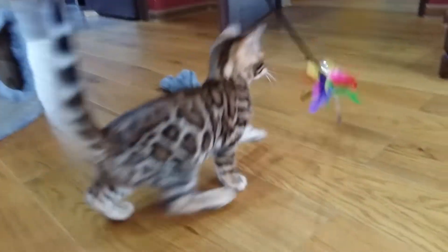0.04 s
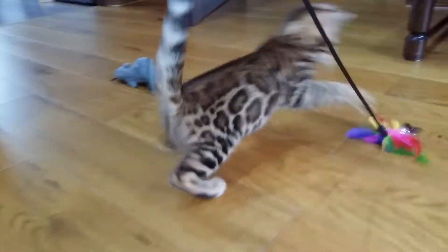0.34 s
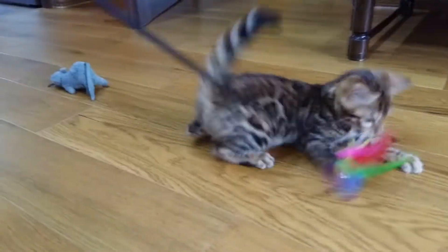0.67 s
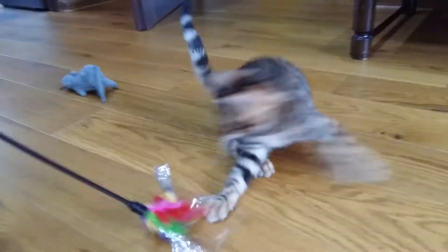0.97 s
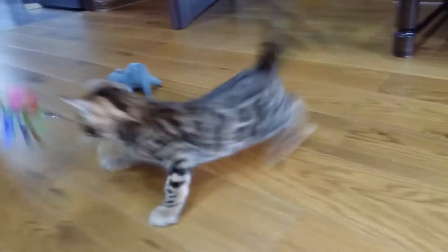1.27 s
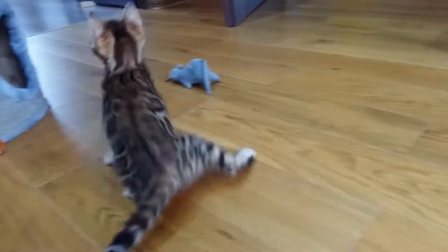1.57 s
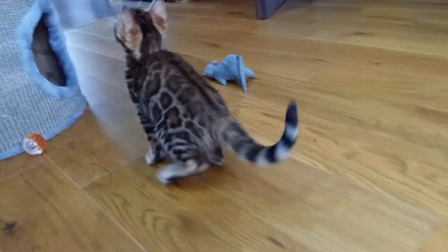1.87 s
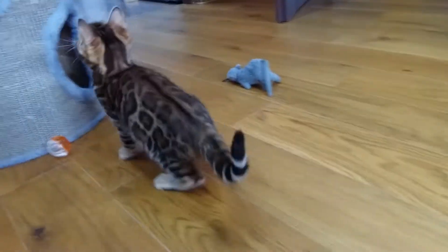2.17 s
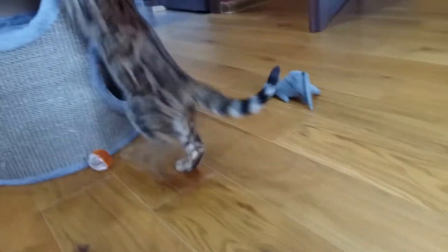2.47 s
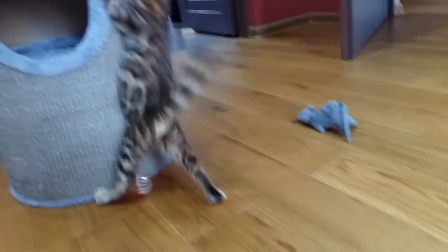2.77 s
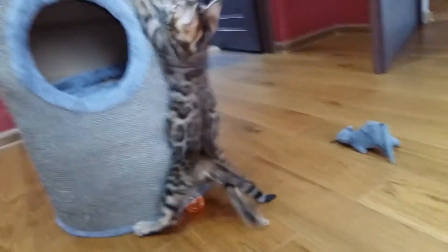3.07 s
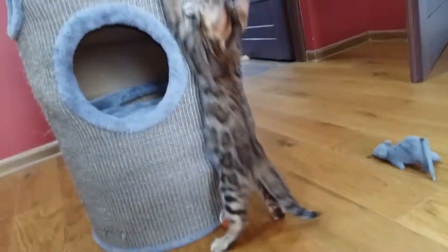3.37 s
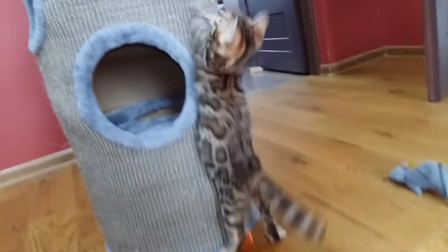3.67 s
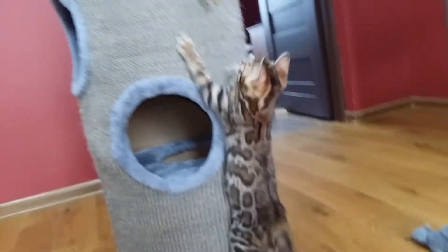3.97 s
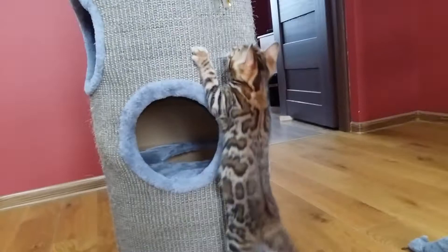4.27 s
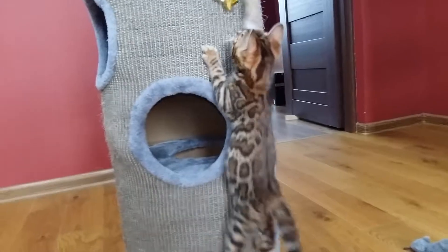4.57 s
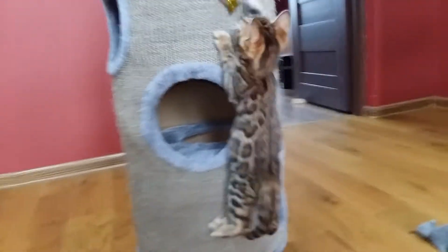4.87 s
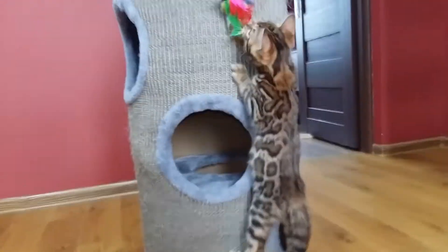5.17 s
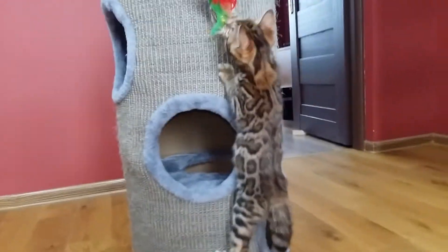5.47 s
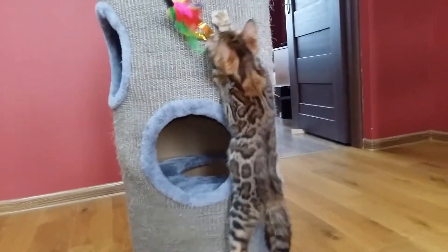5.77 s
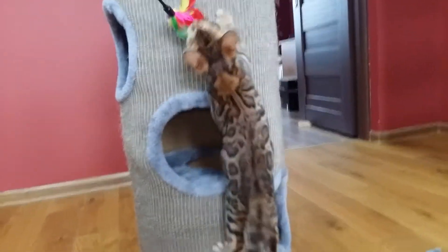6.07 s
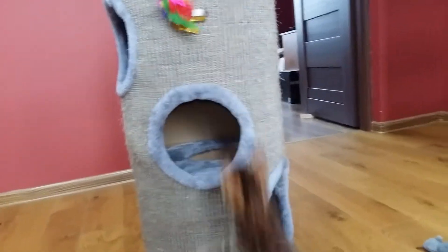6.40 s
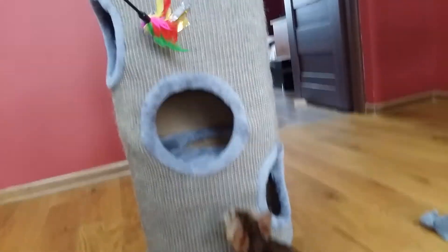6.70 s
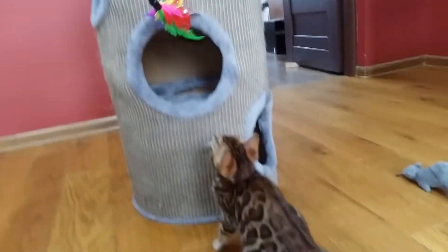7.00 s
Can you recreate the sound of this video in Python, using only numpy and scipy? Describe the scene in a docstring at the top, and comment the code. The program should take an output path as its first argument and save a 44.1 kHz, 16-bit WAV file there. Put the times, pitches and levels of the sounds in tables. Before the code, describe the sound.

A kitten scampers over floorboards in quick, uneven thumps, mixed with the crinkle and sharp slaps of a foil toy. After a short lull it climbs a scratching tower with hollow pats and raspy claws, and a kicked bell ball rattles for a moment. Dry little ticks continue until firmer pats lead to a loud, knocking landing on wood. The microphones are close, in a small room with slight reverberation and a faint hush.

```python
"""A kitten chases a tinsel wand toy over a wooden floor, kicks a bell ball and climbs a hollow sisal tower.
Paws drive the board and tower resonances, claws scratch the rope, and the drop back down knocks hard.
The foil rustles as a shower of tiny snaps; the plastic ball clacks and rolls while a pellet rings its bell.
Two close microphones in a small, fairly live room with a low hush."""
import sys
import numpy as np
from scipy import signal
from scipy.fft import rfft, irfft, next_fast_len
from scipy.io import wavfile
from scipy.ndimage import uniform_filter1d, map_coordinates

SR = 44100
rng = np.random.default_rng(int(sys.argv[2]) if len(sys.argv) > 2 else 0)


def put_to_file(sound):
    """Save the sound as 16-bit audio at rate SR, in the file named by the first command-line argument."""
    columns = np.atleast_2d(sound).T  # one column per channel
    safe = np.clip(columns, -1, 1)
    whole_steps = np.round(safe * 32767)
    wavfile.write(sys.argv[1], SR, whole_steps.astype(np.int16))


N = 310464
FFT_SIZE = 16384
HZ = np.fft.rfftfreq(FFT_SIZE, 1 / SR)
TIME_S = np.arange(N) / SR

# room tone spectrum: f/Hz, level/dB (all table levels are relative)
HUSH_COLOUR = [(48, -5.5), (107, -2.5), (537, -11), (1020, -16), (1850, -17), (4040, -28), (5430, -38),
               (15500, -42.5)]
# room tone drift: t/s, level/dB
HUSH_DRIFT = [(.3, -58), (2.5, -59), (3.9, -61.5), (5.2, -59), (5.85, -63), (7, -58.5)]
# paws on the floor: t/s, thump/dB, claw/dB
FLOOR_STEPS = [(0.212, -47, -69), (0.484, -31, -52.5), (0.561, -42, -62), (0.62, -36.5, -74),
               (0.694, -35, -51), (0.711, -34, -62), (0.775, -37, -65), (0.908, -29, -66),
               (1.016, -34, -37), (1.141, -33, -50.5), (1.358, -42.5, -48), (1.427, -44.5, -52),
               (1.487, -22.5, -42), (1.515, -33.5, -52), (1.588, -24, -63), (2.169, -50, -66.5)]
# floorboard resonances: f/Hz, width/Hz, level/dB
BOARD_MODES = [(72, 24, 1), (108, 32, -2), (148, 42, -2.5), (235, 65, -2), (330, 110, 0.5), (460, 150, 1),
               (750, 300, -4), (1150, 500, -7), (2800, 2500, -14)]
# toy strikes floor or tower: t/s, tip slap/dB, tinsel burst/dB
TOY_STRIKES = [(0.48, -47, -44.5), (0.694, -59, -45), (1.0162, -22.5, -37.5), (1.195, -18, -36),
               (1.476, -21.5, -36), (3.5, -41.5, -40), (4.669, -44, -45), (4.974, -34, -44.5)]
# toy sweeps: crest t/s, level/dB, half length/s
TOY_SWEEPS = [(0.799, -41.5, 0.066), (0.932, -51, 0.11), (1.09, -53.5, 0.2), (1.187, -39.5, 0.03),
              (1.247, -39, 0.024), (3.182, -54, 0.12), (3.698, -58.5, 0.16), (4.875, -56.5, 0.19),
              (5.363, -61.5, 0.37)]
# tinsel rustle spectrum: f/Hz, level/dB
RUSTLE_COLOUR = [(200, 7), (1000, 1), (1500, 0.5), (2050, 6), (2800, -2), (3800, -4.5), (5700, -9),
                 (9000, -18.5), (13300, -24), (16000, -28)]
# snapping foil spectrum: f/Hz, level/dB
CRINKLE_COLOUR = [(500, -4), (4200, 11.5), (9000, -11), (13300, -10.5), (16000, -10.5)]
# single foil strips snap: t/s, level/dB
FOIL_SNAPS = [(0.532, -38), (0.6018, -43), (0.757, -37), (0.8792, -26.5), (1.154, -29.5), (1.2017, -42)]
# small dry ticks (claw clicks, then the toy's foil crinkling): t/s, level/dB
DRY_TICKS = [(2.3905, -45.5), (2.575, -31), (2.631, -36.5), (3.1843, -32), (3.7066, -37), (4.347, -53),
             (4.418, -48), (4.6595, -37), (4.678, -41.5), (4.7581, -44), (4.798, -40.5), (4.9854, -37),
             (5.0354, -46), (5.222, -45.5), (5.3008, -39.5), (5.3276, -38.5), (5.4352, -33.5),
             (5.4864, -38.5), (5.5379, -36.5), (6.3704, -48)]
# dry tick and pellet chatter spectrum: f/Hz, level/dB
CLICK_COLOUR = [(300, -3.5), (1000, -3.5), (2100, 9), (2900, 0.5), (4000, 13), (6000, -8), (9000, -19.5),
                (16000, -19)]
# paws on the tower: t/s, boom/dB, grip/dB (sets pat and scratch)
TOWER_STEPS = [(2.579, -33.5, -57.5), (2.622, -34, -55.5), (2.75, -32, -74), (3.13, -29.5, -56),
               (3.203, -27.5, -57), (3.54, -36.5, -52), (3.737, -32, -53.5), (3.996, -34, -58),
               (4.033, -36.5, -57.5), (4.173, -37.5, -58.5), (4.388, -38, -50.5), (4.575, -62, -61),
               (4.678, -35, -50.5), (4.702, -40, -56), (4.771, -35.5, -50.5), (5.951, -25, -47),
               (6.114, -26, -47), (6.166, -24, -45), (6.311, -28.5, -47.5)]
# tower wall and cavity: f/Hz, level/dB
TOWER_COLOUR = [(50, -25), (95, -4), (150, 3.5), (230, -9.5), (380, -8.5), (610, 0), (1100, -8),
                (1800, -12.5), (2800, -28.5), (4300, -25.5), (10000, -67)]
# claws drag down the rope; the last row is the tower rattling and crackling as the kitten drops: crest t/s,
# level/dB, half length/s
TOWER_SCRAPES = [(2.685, -44.5, 0.097), (3.577, -51, 0.12), (4.085, -47, 0.096), (6.36, -47, 0.12),
                 (6.536, -30, 0.07)]
# scratched rope spectrum: f/Hz, level/dB
SISAL_COLOUR = [(50, -40), (130, 6.5), (280, -0.5), (650, -2.5), (950, -7.5), (2200, -14.5), (3300, -23.5),
                (4500, -26.5), (8000, -45.5)]
# ball hits floor and tower: t/s, level/dB
BALL_CLACKS = [(2.778, -26), (2.7842, -23), (2.808, -29), (2.8145, -31), (2.837, -27), (2.858, -22.5),
               (2.8803, -24.5), (2.905, -33.5)]
# ball shell resonances: f/Hz, width/Hz, level/dB
SHELL_MODES = [(426, 83, 19), (630, 120, 17.5), (1120, 330, -2), (1840, 1100, -31)]
# ball ribs rumble: crest t/s, level/dB, rise/s, fall/s
BALL_ROLL = (2.835, -41.5, 0.28, 0.2859)
# rolling shell spectrum: f/Hz, level/dB
ROLL_COLOUR = [(100, -2.5), (400, 1.5), (750, 0), (1500, -9), (4500, -16), (8000, -30), (15000, -35)]
# pellet thrown round the bell: t/s, level/dB
PELLET_THROWS = [(2.781, -32.5), (2.833, -31), (2.908, -29.5), (2.947, -33), (3.001, -53)]
# bell resonances: f/Hz, level/dB
BELL_MODES = [(2589, -2), (3370, -7), (3745, -0.5), (4740, -2), (5518, -5), (10810, -12)]
# drop from the tower: t/s, thud/dB, knock/dB, knock f/Hz, crack/dB, contact edge f/Hz
LANDING_BLOWS = [(6.449, -20, -8.5, 332, -11.5, 4700), (6.497, -8.5, -6, 444, -10.5, 2070),
                 (6.564, -22, -21, 312, -23, 2800)]
# bearing of kitten and toy: t/s, right microphone's lead/ms
RIGHT_LEAD = [(0.5, 0.12), (0.88, 0.082), (1.02, -0.11), (2.8, -0.13), (4, -0.074), (5.5, -0.036),
              (6.4, 0.061)]
# room decay: f/Hz, t60/s
ROOM_T60 = [(150, 0.38), (1000, 0.54), (4000, 0.47), (12000, 0.37)]
# reverberation spectrum: f/Hz, level/dB
ROOM_COLOUR = [(60, -5.5), (110, -1), (160, 1), (420, -1), (1000, 1)]


def amp(db):
    """Decibels to gain."""
    return 10 ** (np.asarray(db) / 20)


def unit_rms(x):
    """Scale to rms 1."""
    return x / np.sqrt(np.mean(x ** 2) + 1e-20)


def unit_peak(x):
    """Scale to peak 1."""
    return x / np.abs(x).max()


def add(track, at_s, sound):
    """Mix a sound into the track."""
    part = track[max(round(at_s * SR), 0):][:len(sound)]
    part += sound[:len(part)]


def log_interp(points, hz):
    """Read (f/Hz, value) points on a log axis."""
    knots_hz, values = np.transpose(points)
    return np.interp(np.log(hz + 1), np.log(knots_hz + 1), values)


def filtered(x, response):
    """Apply a response given as a function of f/Hz."""
    n = x.shape[-1]
    padded = next_fast_len(n + FFT_SIZE)
    return irfft(rfft(x, padded) * response(np.fft.rfftfreq(padded, 1 / SR)), padded)[..., :n]


def min_phase(colour):
    """Minimum-phase response through (f/Hz, level/dB) points."""
    cepstrum = irfft(np.log(amp(log_interp(colour, HZ))))
    cepstrum[1:FFT_SIZE // 2] *= 2
    cepstrum[FFT_SIZE // 2 + 1:] = 0
    return np.exp(rfft(cepstrum))


def resonances(modes, scatter_db):
    """Modes (f/Hz, width/Hz, level/dB) struck at a new spot, so each has a new strength."""
    return sum(amp(db + scatter_db * rng.normal()) * 1j * HZ * width / (hz**2 - HZ**2 + 1j * HZ * width)
               for hz, width, db in modes)


def bending(travel):
    """Bending waves carry treble faster than bass: delay/s = travel / sqrt(f/Hz)."""
    return np.exp(-4j * np.pi * travel * np.sqrt(HZ))


def scuff(t60_s, catch_s):
    """Spectrum of a rough contact of energy 1: it catches, chatters and dies."""
    t = TIME_S[:FFT_SIZE]
    force = rng.standard_normal(FFT_SIZE) * amp(-60 * t / t60_s) * (1 - np.exp(-t / catch_s)) ** 2
    return rfft(force / np.linalg.norm(force))


def strokes(events, colour, snaps_per_s, spread_db):
    """Swelling showers of tiny uneven snaps; events: crest t/s, level/dB, rise/s, fall/s."""
    power = np.zeros(N)
    for crest_s, db, rise_s, fall_s in events:
        t = np.arange(-2 * rise_s, 2 * fall_s, 1 / SR)
        envelope_db = db - 20 * np.where(t < 0, -t / rise_s, (t / fall_s) ** 2)
        add(power, crest_s - 2 * rise_s, amp(envelope_db) ** 2)
    snaps = (rng.random(N) < snaps_per_s / SR) * rng.standard_normal(N)
    snaps *= amp(spread_db * np.clip(rng.standard_normal(N), -2, 2))
    return np.sqrt(power) * unit_rms(signal.fftconvolve(snaps, irfft(min_phase(colour)))[:N])


def ticks(events, colour, t60_s):
    """Brief sharp ticks of one colour; events: t/s, level/dB."""
    out, response = np.zeros(N), min_phase(colour)
    for at_s, db in events:
        tick = irfft(scuff(t60_s, catch_s=0.0016) * response)
        add(out, at_s, amp(db) * unit_peak(tick))
    return out


def diffuse_noise(n, mic_spacing_s=0.0007):
    """Noise from all sides: alike at both microphones in the bass, unrelated in the treble."""
    def mid_side_gains(hz):
        angle = np.arccos(0.96 * np.sinc(2 * hz * mic_spacing_s)) / 2
        return np.array([np.cos(angle), np.sin(angle)])
    mid, side = filtered(rng.standard_normal((2, n)), mid_side_gains)
    return np.array([mid + side, mid - side])


def room_tone():
    """Diffuse hush, drifting slowly in level."""
    level_db = np.interp(TIME_S, *np.transpose(HUSH_DRIFT))
    hush = filtered(diffuse_noise(N), lambda hz: amp(log_interp(HUSH_COLOUR, hz)))
    return amp(level_db) * unit_rms(hush)


def floor_paws(claw_share=0.48):
    """The soft pad pushes the boards once while the claws skid; more claw makes a harder knock."""
    out = np.zeros(N)
    for at_s, thump_db, claw_db in FLOOR_STEPS:
        knock_db = thump_db - 3 + claw_share * (claw_db - thump_db)
        pad = min_phase([(190, thump_db), (380, knock_db), (650, knock_db), (3000, knock_db - 32.5)])
        skid = scuff(t60_s=0.021, catch_s=0.0013) * HZ / (HZ + 500)
        claws = amp(claw_db) * skid * min_phase([(4000, -1), (12000, -26)])
        boards = resonances(BOARD_MODES, scatter_db=2) * bending(travel=0.04025)
        add(out, at_s, -amp(45) * irfft((pad + claws) * boards))
    return out


def toy_tinsel(lag_s=0.0011, rise_s=0.012, fall_s=0.028, settle_db=-21, settle_s=0.32):
    """Foil flares and settles at each hit and rustles when swept; single folds crinkle on top."""
    bursts = [(at_s + lag_s, db, rise_s, fall_s) for at_s, _, db in TOY_STRIKES]
    settling = [(at_s, db + settle_db, rise_s, settle_s) for at_s, db, _, _ in bursts]
    sweeps = [(at_s, db, half_s, half_s) for at_s, db, half_s in TOY_SWEEPS]
    motion = bursts + settling + sweeps
    rustle = strokes(motion, RUSTLE_COLOUR, snaps_per_s=1700, spread_db=0.5)
    crinkle = strokes(motion, CRINKLE_COLOUR, snaps_per_s=210, spread_db=9.5)
    return amp(-3) * rustle + amp(-6) * crinkle


def toy_slaps():
    """The toy's tip slaps down and single foil strips snap brightly."""
    slaps = [(at_s, db) for at_s, db, _ in TOY_STRIKES]
    return ticks(slaps + FOIL_SNAPS, CRINKLE_COLOUR, t60_s=0.016)


def dry_ticks():
    """Small dry ticks: claw clicks, then the toy's foil crinkling."""
    return ticks(DRY_TICKS, CLICK_COLOUR, t60_s=0.018)


def tower_pats(lap_s=0.021, lap_db=-9):
    """A paw settles unevenly on the rope; the wall's wave disperses and returns once round the tube."""
    out = np.zeros(N)
    for at_s, boom_db, grip_db in TOWER_STEPS:
        pad = min_phase([(300, -1.5), (1500, -18)])
        fibres = amp(-1) * scuff(t60_s=0.02, catch_s=0.0061) * HZ / (HZ + 350)
        force = (pad + fibres) * min_phase([(250, boom_db), (550, grip_db + 9.5)])
        detune = np.exp(0.1 * rng.normal())  # stiffness differs from spot to spot
        wall = min_phase([(hz * detune, db + 2 * rng.normal()) for hz, db in TOWER_COLOUR])
        wave = amp(43) * irfft(force * wall * bending(travel=0.15))
        add(out, at_s - 0.003, wave)
        add(out, at_s + lap_s * (1 + 0.0643 * rng.normal()), amp(lap_db) * wave)
    return out


def sisal_scratches(lag_s=0.0095, rise_s=0.07, fall_s=0.13):
    """Claws catch the rope after every pat and now and then drag down it; the tower rattles as the kitten
    drops."""
    catches = [(at_s + lag_s, grip_db - 2, rise_s, fall_s) for at_s, _, grip_db in TOWER_STEPS]
    drags = [(at_s, db, half_s, half_s) for at_s, db, half_s in TOWER_SCRAPES]
    return amp(-4) * strokes(catches + drags, SISAL_COLOUR, snaps_per_s=480, spread_db=1)


def ball():
    """The kicked shell knocks between boards and tower and rumbles on its ribs."""
    out, contact = np.zeros(N), min_phase([(2200, 5), (9000, -27)])
    for at_s, db in BALL_CLACKS:
        clack = irfft(resonances(SHELL_MODES, scatter_db=7) * contact * bending(travel=0.013))
        add(out, at_s, -amp(db) * unit_peak(clack))
    return out + strokes([BALL_ROLL], ROLL_COLOUR, snaps_per_s=1100, spread_db=1)


def bell(width_hz=14.5, ring_db=23):
    """The pellet chatters round the ball's bell; each throw rings a new mix of its modes."""
    out = np.zeros(N)
    modes = [(hz, width_hz, db + ring_db) for hz, db in BELL_MODES]
    for at_s, db in PELLET_THROWS:
        chatter = scuff(t60_s=0.042, catch_s=0.0016)
        response = min_phase(CLICK_COLOUR) + resonances(modes, scatter_db=5.5)
        add(out, at_s, amp(db) * unit_peak(irfft(chatter * response)))
    return out


def struck_wood(modes, mode_ratio):
    """Modes scaled so that width does not set their peak; mode k is weighted by mode_ratio ** k."""
    return sum(mode_ratio ** k * resonances([(hz, width, db)], scatter_db=1.5) * SR / (2 * np.pi * width)
               for k, (hz, width, db) in enumerate(modes))


def landing(overtone_ratio=1.28, rebound_s=0.0122, rebound_db=-9.5):
    """Hard blows on wood: thud, hollow knock and crack, dulled by contact time; each rebounds once."""
    out = np.zeros(N)
    for at_s, thud_db, knock_db, knock_hz, crack_db, edge_hz in LANDING_BLOWS:
        hollow_modes = [(122, 38, thud_db), (knock_hz, 105, knock_db),
                        (knock_hz * overtone_ratio, 220, knock_db - 2.5)]
        contact = min_phase([(edge_hz, 0), (2 * edge_hz, -13), (20000, -28)])
        for delay_s, db, snap_db in [(0, 0, crack_db), (rebound_s, rebound_db, crack_db - 21)]:
            crack_modes = [(1210, 290, snap_db), (2250, 340, snap_db + 0.5),
                           (3450, 400, snap_db - 9), (4300, 530, snap_db - 16.5)]
            crack = struck_wood(crack_modes, mode_ratio=0.81)
            chatter = amp(-8) * scuff(t60_s=0.088, catch_s=0.001)
            blow = crack * (1 + chatter) - struck_wood(hollow_modes, mode_ratio=-1.14)
            add(out, at_s + delay_s - 0.0005, amp(db) * irfft(blow * contact * bending(travel=0.0237)))
    return out


def direct_path(x, right_db, shade_db_per_ms):
    """Sound reaches the nearer microphone first; the treble balance shifts with the bearing."""
    lead_ms = np.interp(TIME_S, *np.transpose(RIGHT_LEAD))
    balance_db = right_db + shade_db_per_ms * lead_ms
    treble = filtered(x, lambda hz: hz / (hz + 500))
    pair = []
    for side in (-1, 1):
        shaded = x + treble * (amp(side * balance_db / 2) - 1)
        read_s = TIME_S + side * lead_ms / 2000
        pair.append(map_coordinates(shaded, [read_s * SR], order=3))
    return np.array(pair)


def room_reverb(x, early_db=4, early_s=0.012, gap_s=0.004):
    """Near furniture answers first, then the walls; a new pattern every 1/3 s as the kitten moves."""
    out, step = np.zeros((2, N)), SR // 3
    for start in range(0, N, step):
        hz, t, noise = signal.stft(diffuse_noise(FFT_SIZE), SR, nperseg=256)
        fade_db = -60 * t / log_interp(ROOM_T60, hz)[:, None] + early_db * np.exp(-t / early_s)
        response = rfft(signal.istft(noise * amp(fade_db), SR, nperseg=256)[1], FFT_SIZE)
        # smooth the noise tail's spectrum so every reverberation has the same even colour
        power = np.abs(uniform_filter1d(np.mean(np.abs(response) ** 2, axis=0), size=45))
        gain_db = log_interp(ROOM_COLOUR, HZ) - 10 * np.log10(power)
        tails = irfft(response * min_phase(np.column_stack([HZ, gain_db])))
        for channel, tail in zip(out, tails):
            add(channel, start / SR + gap_s, signal.fftconvolve(x[start:start + step], tail))
    return out


def scene():
    """All sources, direct and through the room."""
    paws, drop, pats, bell_ball = floor_paws(), landing(), tower_pats(), ball() + bell()
    clicks = toy_slaps() + dry_ticks()
    tinsel, sisal = toy_tinsel(), sisal_scratches()
    kitten = direct_path(paws + drop + pats + sisal, right_db=3.5, shade_db_per_ms=-13)
    toys = direct_path(tinsel + clicks + bell_ball, right_db=8.5, shade_db_per_ms=41)
    send = (amp(-3) * paws + amp(-5.5) * (pats + drop) + amp(-6) * clicks
            + amp(-1) * bell_ball + amp(1) * (tinsel + sisal))
    return kitten + toys + room_reverb(send) + room_tone()


def record(dry):
    """The microphones lose the deepest bass and the top treble."""
    low_hz, top_hz = 55, 15850
    low_cut = signal.butter(6, low_hz, "highpass", fs=SR, output="sos")
    return filtered(signal.sosfilt(low_cut, dry), lambda hz: hz < top_hz)


dry = scene()
out = record(dry)
put_to_file(out)
```